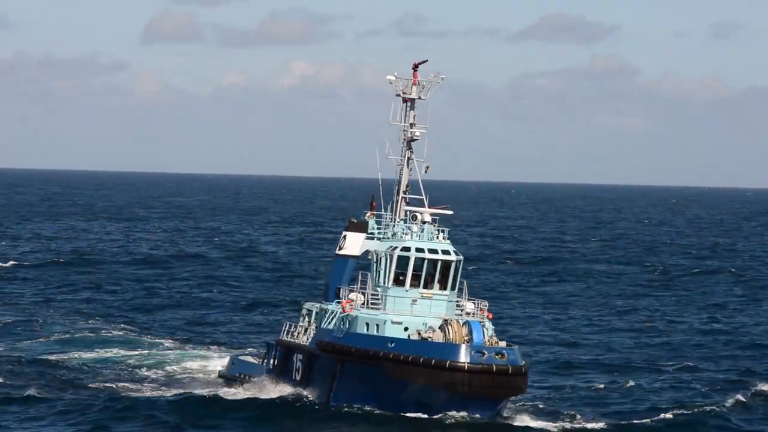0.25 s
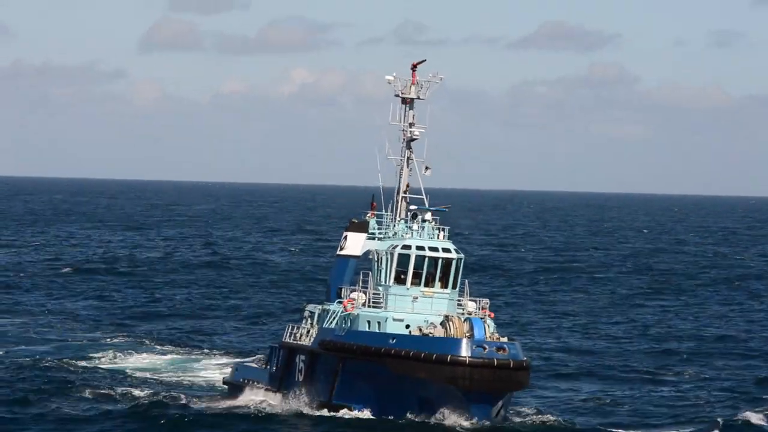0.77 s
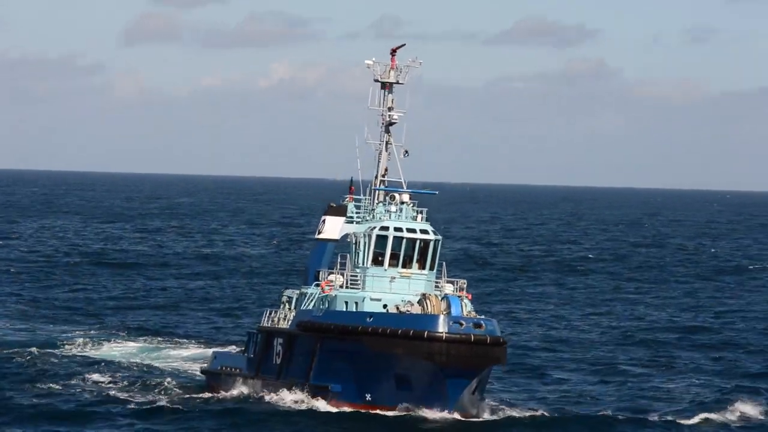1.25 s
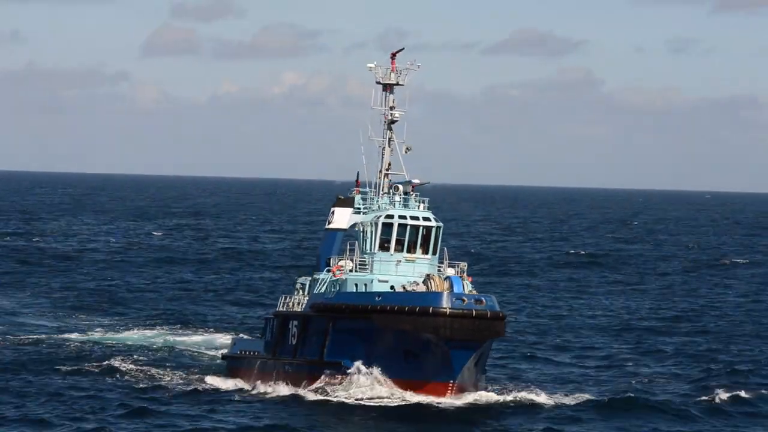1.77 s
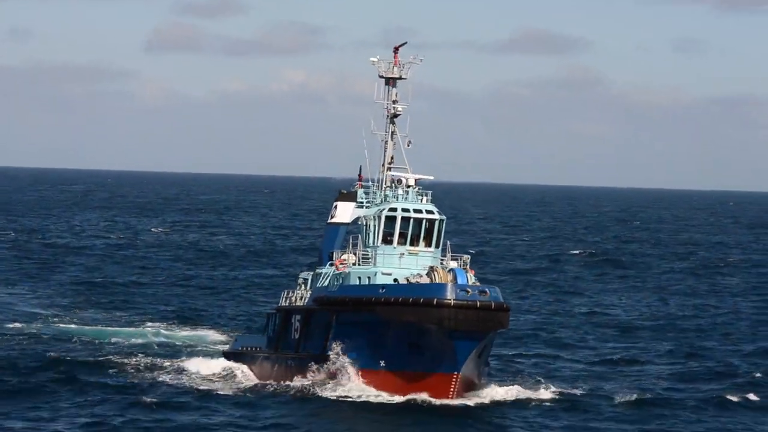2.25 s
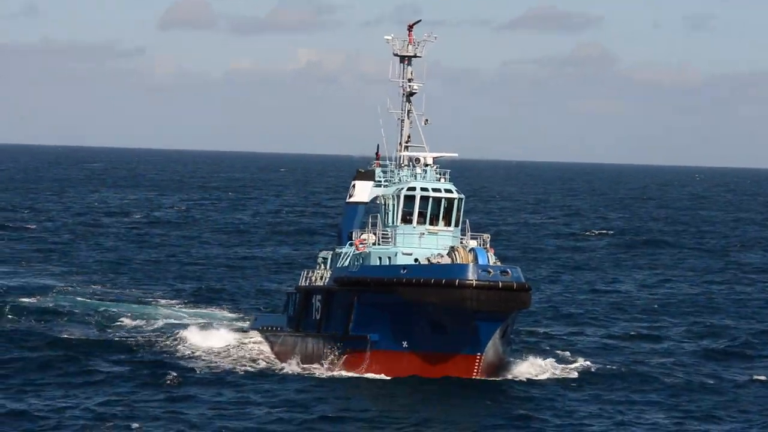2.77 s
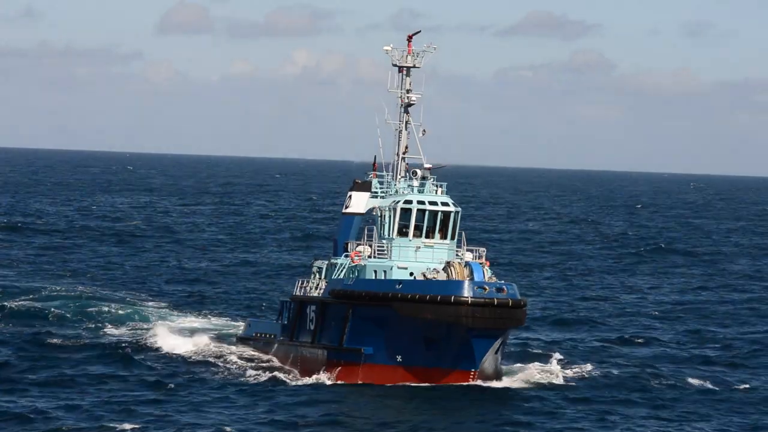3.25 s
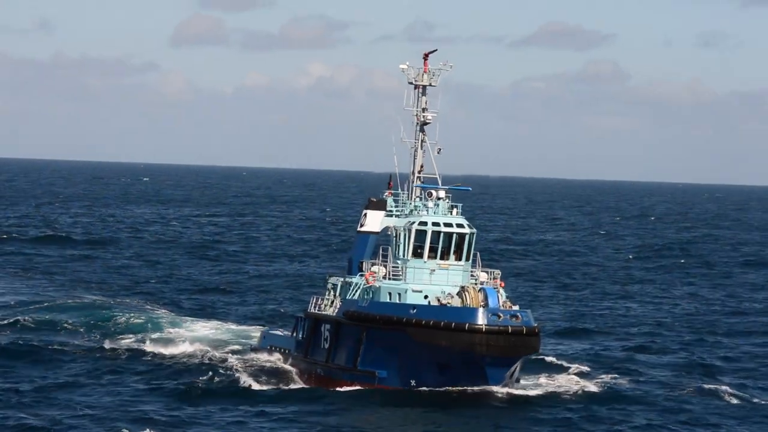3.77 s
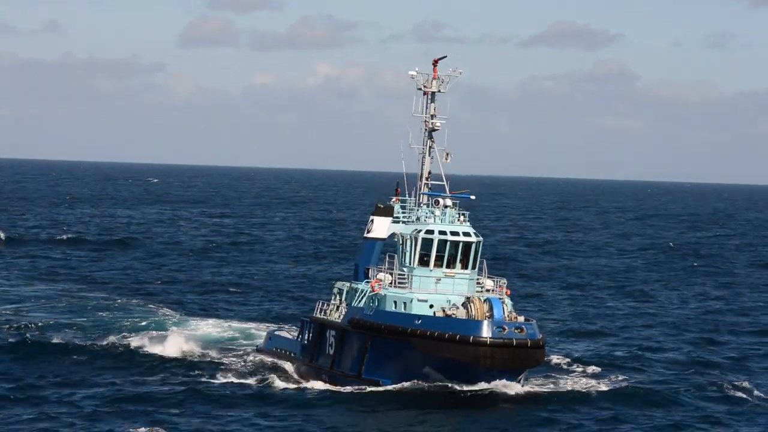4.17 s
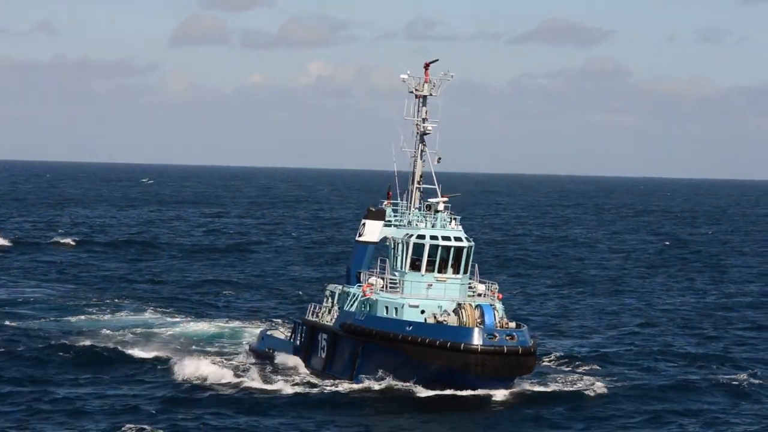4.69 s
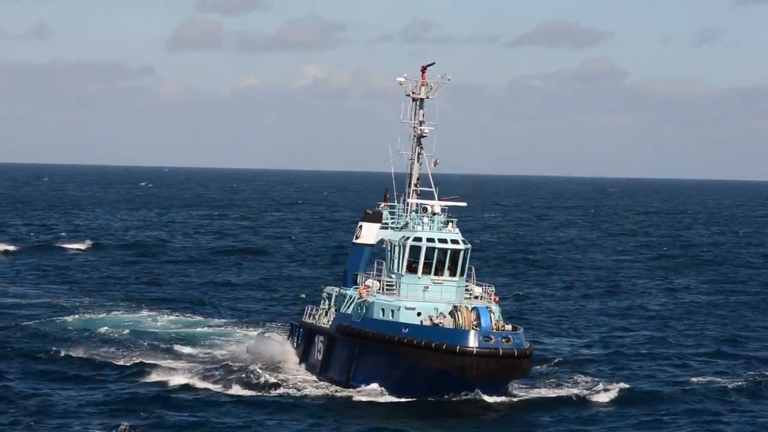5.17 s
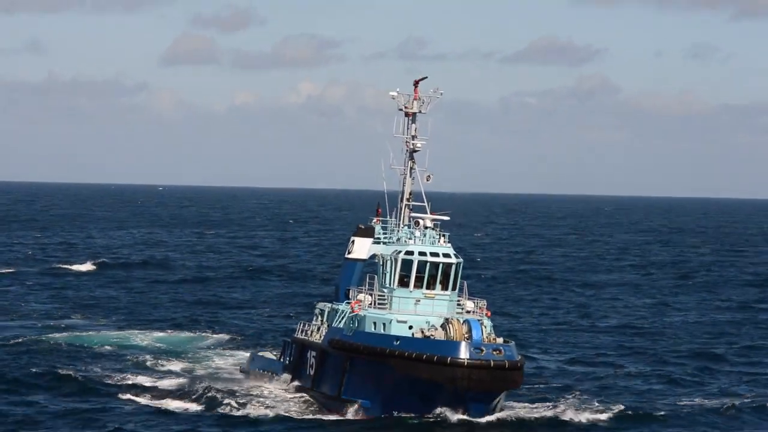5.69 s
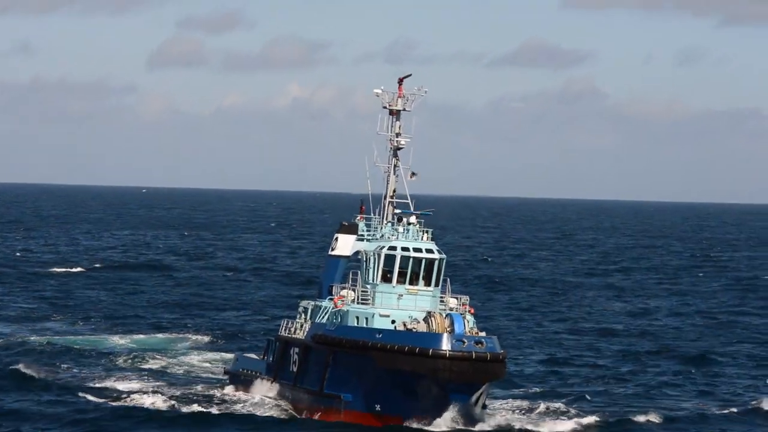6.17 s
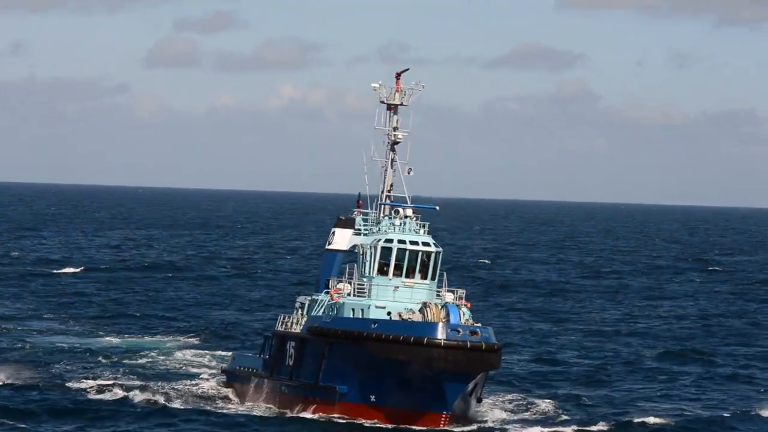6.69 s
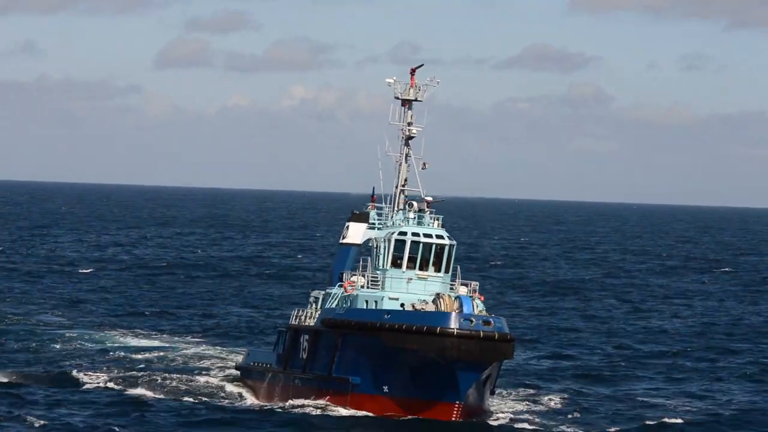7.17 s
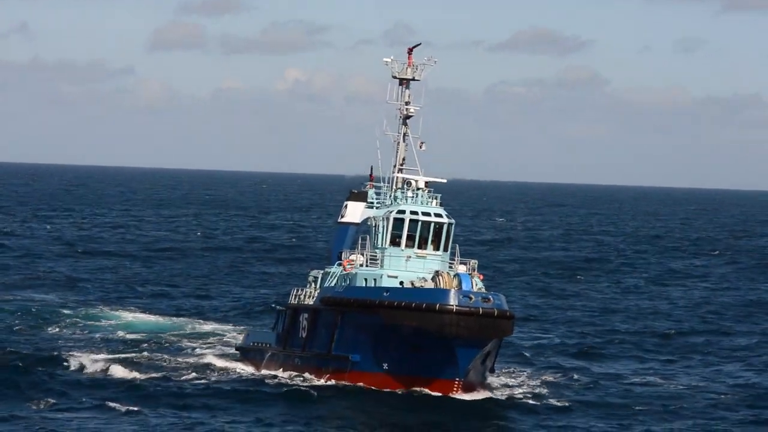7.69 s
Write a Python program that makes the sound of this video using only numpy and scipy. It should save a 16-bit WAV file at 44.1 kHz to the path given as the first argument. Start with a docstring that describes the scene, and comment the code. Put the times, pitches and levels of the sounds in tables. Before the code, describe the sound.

From the first moment to the end at about 8 seconds, two large marine diesel engines drone steadily, heard from the deck of a vessel at sea. Their deep tone dominates and throbs about five times a second. The speed stays constant, though the two engines drift slowly against each other and the lowest notes gently grow and fade. A broad exhaust rumble fills out the drone, and a rough midrange rasp chuffs in the funnel with each throb, rising and falling slightly about every three seconds. Behind the engines, the sea washes continuously along the hull with a faint, high fizz of foam. Small waves lift the wash softly near 0.5 seconds, several times between about 3 and 4.7 seconds, and again around 6.5 and 7.8 seconds. The overall level stays even throughout.

```python
"""Two big slow diesels, heard from the deck of a vessel at sea, run near 600 rpm.
Each exhaust is a sum of harmonics of the four-stroke cycle; uneven cylinders make it throb five
times a second, and the twin engine drifts slowly against the main one. Broad noise makes the gas rumble.
Noise through resonators makes the gas rasp in the funnel once a cycle; behind it the sea, shaped noise
and sparse clicks, washes and fizzes along the hull."""
import sys
import numpy as np
from scipy import signal
from scipy.fft import rfft, irfft, next_fast_len
from scipy.io import wavfile
from scipy.ndimage import uniform_filter1d, minimum_filter1d, map_coordinates

SR = 44100
rng = np.random.default_rng(int(sys.argv[2]) if len(sys.argv) > 2 else 0)


def pcm_store(signal):
    """Save signal as 16-bit PCM."""
    levels = np.round(np.clip(np.atleast_2d(signal), -1, 1) * 32767)
    wavfile.write(sys.argv[1], SR, levels.astype(np.int16).T)


N = 350154


def amp(db):
    """Level to pressure ratio: 20 dB is a factor of ten."""
    return 10 ** (np.asarray(db) / 20)


def unit(x):
    """Normalisation to a root-mean-square value of 1."""
    return x / np.sqrt(np.mean(x ** 2) + 1e-20)


def curves(rows):
    """Linear interpolation over time: one value per sample for each column after the time."""
    seconds, *columns = np.transpose(rows)
    t = np.arange(N) / SR
    return [np.interp(t, seconds, column) for column in columns]


def wobble(knots_per_s):
    """Slow random modulation: a smooth spline through random knots."""
    knots = rng.standard_normal(int(N * knots_per_s / SR) + 4)
    return map_coordinates(knots, [np.arange(N) * knots_per_s / SR])


def filtered(x, response):
    """Linear filtering: the spectrum is multiplied by a response of frequency."""
    size = next_fast_len(N + SR // 2)
    hz = np.fft.rfftfreq(size, 1 / SR)
    return irfft(rfft(x, size) * response(hz), size)[:N]


def coloured(x, spectrum):
    """Spectral shaping along a log-frequency curve of (Hz, dB) points, at rms 1."""
    f, db = np.transpose(spectrum)
    return unit(filtered(x, lambda hz: amp(np.interp(np.log(hz + 1), np.log(f), db))))


def patchy_noise(patchy_db):
    """Uneven turbulence: white noise whose gain varies in short patches of time and frequency."""
    bins = signal.stft(rng.standard_normal(N), nperseg=512)[2]
    across_hz = uniform_filter1d(rng.standard_normal(bins.shape), size=8, axis=0)
    patches = uniform_filter1d(across_hz, size=16, axis=1)
    noise = signal.istft(bins * amp(patchy_db * unit(patches)), nperseg=512)[1]
    return unit(noise[:N])


def repeated(shape, cycles):
    """Periodicity: one cycle's shape, played over and over as the engine turns."""
    return np.interp(cycles % 1, np.linspace(0, 1, len(shape) + 1), np.append(shape, shape[0]))


# Speed of the main engine. Each row: time in seconds, four-stroke cycles per second.
MAIN_SPEED = [(0.0, 5.0002), (1.5, 4.9973), (3.0, 4.996), (3.9, 5.0047), (4.7, 4.9939), (5.5, 4.9836),
              (6.4, 4.9974), (7.2, 5.0169), (7.94, 5.0132)]


def main_cycles():
    """Phase is the integral of frequency: cycles the main engine has turned."""
    return np.cumsum(curves(MAIN_SPEED)[0]) / SR


# The eight cylinders as they enter the exhaust pipe.
# Each row: point in the cycle from 0 to 1, relative strength.
CYLINDERS = [(0.105, 1.26), (0.199, 0.79), (0.321, 1.05), (0.446, 1.36), (0.566, 0.94), (0.686, 1.21),
             (0.857, 0.59), (0.981, 0.91)]
# The pipe holds some frequencies longer than others. Each row: frequency in Hz, delay in seconds.
PIPE_DELAY = [(40, 0.019), (90, 0.0), (130, 0.0062), (170, 0.018), (220, 0.0079)]


def exhaust(orders, cycles, cycle_hz, size=4096):
    """Fourier synthesis: the firings and the pipe's group delay set each harmonic's phase."""
    when, strength = np.transpose(CYLINDERS)
    turn = np.arange(size) / size
    delay_s = np.interp(np.arange(size) * cycle_hz, *np.transpose(PIPE_DELAY))
    lag = np.cumsum(delay_s) * cycle_hz  # phase lag in periods: delay summed over frequency
    pressure = np.zeros(size)
    for k, db in orders:
        push = np.sum(strength * np.exp(-2j * np.pi * k * when))
        phase = 2 * np.pi * (k * turn - lag[k]) + np.angle(push)
        pressure += np.sqrt(2) * amp(db) * np.cos(phase)
    return repeated(pressure, cycles)


# Main exhaust, before its scatter. Each row: multiple of the cycle rate, level in dB rms.
MAIN_ORDERS = [(7, -33), (8, -22), (9, -26), (10, -38), (14, -33), (18, -25), (19, -24), (20, -36),
               (21, -39), (23, -40), (24, -26), (25, -30), (26, -30), (27, -28), (29, -38), (30, -38),
               (31, -42), (32, -36), (33, -27), (34, -36), (35, -29), (36, -35), (37, -36), (39, -39),
               (40, -36), (41, -27), (42, -39), (44, -43), (45, -47), (49, -46), (50, -38), (51, -45),
               (54, -44), (77, -45), (107, -47)]
# Twin exhaust, before its scatter. Each row: multiple of the cycle rate, level in dB rms.
TWIN_ORDERS = [(8, -38), (9, -40), (17, -44), (20, -35), (21, -36), (23, -42), (24, -32), (25, -41),
               (28, -40), (30, -35), (31, -34), (32, -35), (33, -31), (34, -40), (44, -44), (54, -43),
               (55, -44), (107, -48)]
# The deepest engine tones slowly grow and fade in level. Each row: time in seconds, gain in dB.
DEEP_GAIN = [(0, -.3), (1.5, -1), (2.7, 1), (4, -1), (4.8, 0.5), (5.6, 1), (6.6, 1.5), (7.2, 0),
             (7.94, -2.5)]
TWIN_HZ = 4.99  # mean four-stroke cycles per second


def engines(cycles, deep_hz=60):
    """Superposition of two nearly equal periods: firings scatter, and the twin's governor hunts a little."""
    scatter_db = .25
    jitter, hunting, twin_lead = .0003, .002, .438  # parts of a cycle
    main = exhaust(MAIN_ORDERS, cycles + jitter * wobble(30), MAIN_SPEED[0][1])
    main = main * amp(scatter_db * wobble(40))
    twin_cycles = TWIN_HZ * np.arange(N) / SR + twin_lead + hunting * wobble(1.285)
    twin = exhaust(TWIN_ORDERS, twin_cycles, TWIN_HZ) * amp(scatter_db * wobble(40))
    both = main + twin
    deep = filtered(both, lambda hz: 1 / (1 + (hz / deep_hz) ** 10))
    return both + (amp(curves(DEEP_GAIN)[0]) - 1) * deep


# Spectrum of the turbulent exhaust gas. Each row: frequency in Hz, relative level in dB per Hz.
GAS_SPECTRUM = [(15, -35), (25, -20), (42, -10), (62, -11), (95, -5), (165, 0), (220, 0), (245, -5),
                (320, -8.5), (430, -14), (900, -24), (2500, -48), (9000, -100)]


def rumble(rumble_db=-28.0, patchy_db=1.0):
    """Turbulence is broadband: the gas fills the gaps between the engine's lines."""
    return amp(rumble_db) * coloured(patchy_noise(patchy_db), GAS_SPECTRUM)


# Funnel resonances. Each row: frequency in Hz, half the bandwidth of one resonator stage in Hz,
# level in dB rms, point in the cycle from 0 to 1 where it swells.
FUNNEL_MODES = [(267.1, 7.6, -39, 0.82), (385.3, 42, -42.5, 0.83), (470, 12.5, -44.5, 0.73),
                (540, 12, -50, 0.67), (599.6, 35, -45.5, 0.65), (649, 46, -37, 0.84), (705, 10, -51.5, 1),
                (819, 77, -42, 0.63), (955.6, 12.4, -48, 0.61)]
SWELL_S, SWELL_CREST_S = 3.1, 0.25  # the long swell that rocks the vessel: period, first crest
RASP_SWELL_DB = 1.34  # the rasp rises and falls this far with the swell


def rasp(cycles, locked=0.44, swell_db=3.5, uneven_db=0.45, turn_db=0.5, turn_at=0.42):
    """Resonance: valve gas, partly alike in every cycle, rings the funnel, with a lighter chuff each shaft turn."""
    share = np.clip(locked, 0, 1)  # share of the gas noise power that repeats
    valves = unit(repeated(rng.standard_normal(size=8192), cycles))
    gas = np.sqrt(share) * valves + np.sqrt(1 - share) * rng.standard_normal(N)
    swell = np.cos(2 * np.pi * (np.arange(N) / SR - SWELL_CREST_S) / SWELL_S)
    shaft = np.cos(2 * np.pi * 2 * (cycles - turn_at))  # two shaft turns a cycle
    load_db = RASP_SWELL_DB * swell + turn_db * shaft + uneven_db * wobble(6)
    out = np.zeros(N)
    for hz, width, db, when in FUNNEL_MODES:
        # two equal band-pass stages in a row
        ring = filtered(gas, lambda f: (1j * f * 2 * width / (hz * hz - f * f + 1j * f * 2 * width)) ** 2)
        chuff = amp(swell_db * np.cos(2 * np.pi * (cycles - when)) + load_db)
        out += amp(db) * unit(ring * chuff)
    return out


# Waves breaking along the hull.
# Each row: crest time in seconds, rise of the foam over calm water in dB, build-up in seconds.
BREAKERS = [(0.55, 2, 1), (2.8, 2.5, 0.45), (3.14, 3.5, 0.14), (3.5, 2.5, 0.28), (4.06, 3, 0.33),
            (4.71, 2.5, 0.33), (5.66, 1, 0.48), (6.55, 2.5, 0.4), (7.85, 2, 0.33)]
COLLAPSE = 0.51  # a wave dies away in this share of its build-up time


def breaking():
    """Asymmetric envelope, in dB: each wave builds up to its crest and collapses faster."""
    t = np.arange(N) / SR
    rise_db = np.zeros(N)
    for crest, db, build in BREAKERS:
        spread = np.where(t < crest, build, COLLAPSE * build)
        rise_db += db * np.exp(-((t - crest) / spread) ** 2)
    return rise_db


# Spectrum of the water along the hull. Each row: frequency in Hz, relative level in dB per Hz.
WASH_SPECTRUM = [(100, -8.5), (400, 2), (800, -1), (1300, -2.5), (2000, -5), (3000, -9.5), (4000, -14.5),
                 (5500, -23), (9000, -36), (16000, -70)]
# Spectrum of the fizzing foam. Each row: frequency in Hz, relative level in dB per Hz.
FOAM_SPECTRUM = [(1500, -17), (3500, -5), (4900, 1.5), (5700, -0.5), (6800, 2), (8500, 0.5), (10000, 0.5),
                 (11000, -5.5), (12000, -12), (13200, -16), (14200, -23), (15700, -31)]
WASH_DB, FOAM_DB = -35.5, -50.5  # between waves
WASH_FOLLOWS = 0.68  # dB of wash for each dB of foam


def sea(wash_patchy_db=0.5, bursts_per_s=900, crackle=0.28, slop_db=0.49):
    """Random impulses in noise: broken water slops and washes; foam fizzes with tiny bursting bubbles."""
    surge_db = breaking() + slop_db * wobble(12)
    wash = coloured(patchy_noise(wash_patchy_db), WASH_SPECTRUM)
    bursts = (rng.random(N) < bursts_per_s / SR) * rng.standard_normal(N)
    foam = coloured(patchy_noise(patchy_db=0.7) + crackle * unit(bursts), FOAM_SPECTRUM)
    return amp(WASH_DB + WASH_FOLLOWS * surge_db) * wash + amp(FOAM_DB + surge_db) * foam


def scene():
    """Superposition: the pressures of engines, gas, funnel and sea add at one point."""
    cycles = main_cycles()
    return (engines(cycles) + rumble() + rasp(cycles) + sea())[None]


def record(dry):
    """Peak limiting and band limiting: fast gain holds the highest peaks, then a sharp low-pass."""
    ceiling, top_hz = .5, 15720
    needed = np.minimum(1, ceiling / (np.abs(dry[0]) + 1e-9))
    gain = uniform_filter1d(minimum_filter1d(needed, size=300), size=300)
    return filtered(dry[0] * gain, lambda hz: hz < top_hz)[None]


dry = scene()
out = record(dry)
pcm_store(out)
```